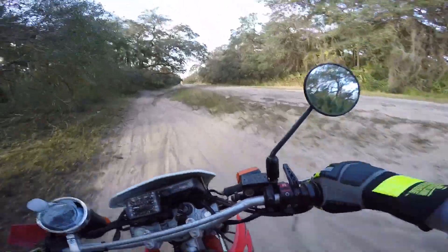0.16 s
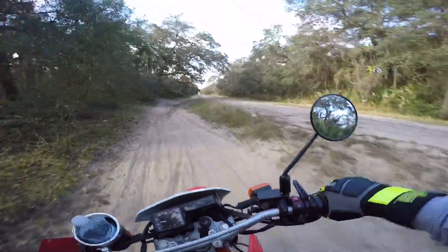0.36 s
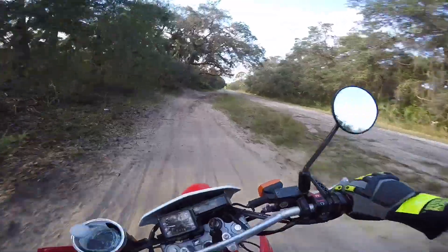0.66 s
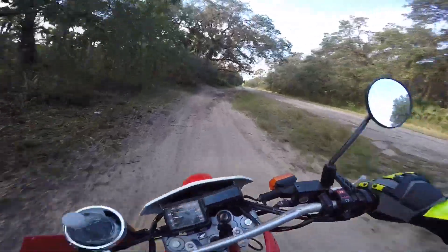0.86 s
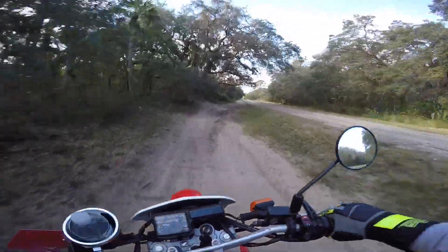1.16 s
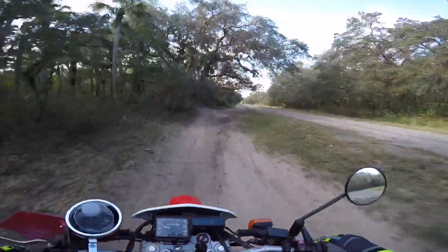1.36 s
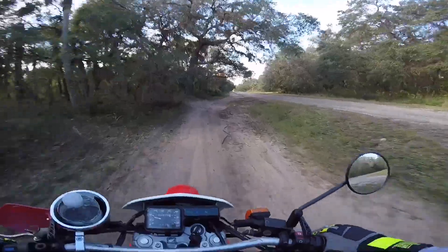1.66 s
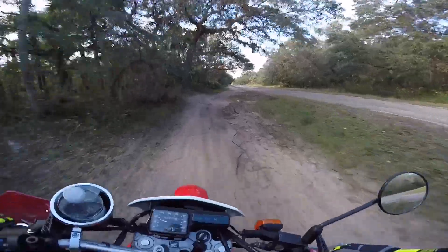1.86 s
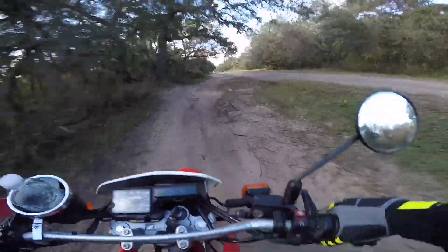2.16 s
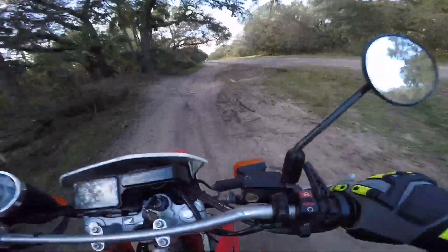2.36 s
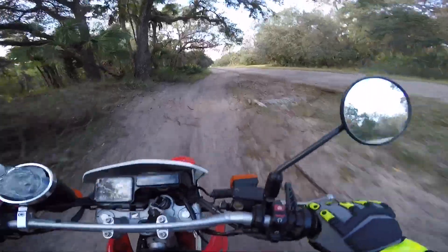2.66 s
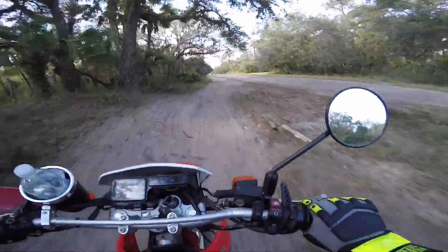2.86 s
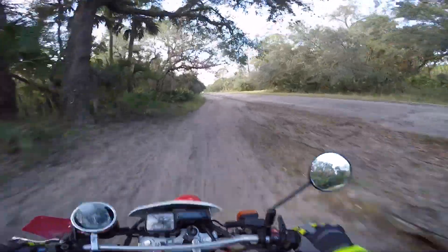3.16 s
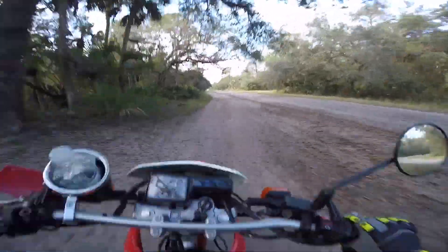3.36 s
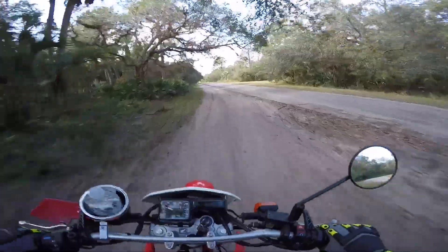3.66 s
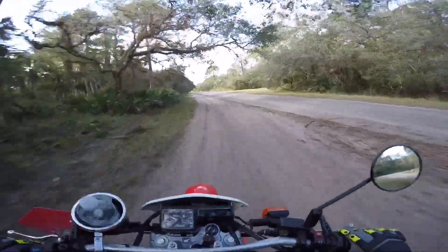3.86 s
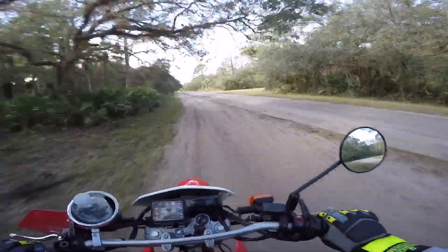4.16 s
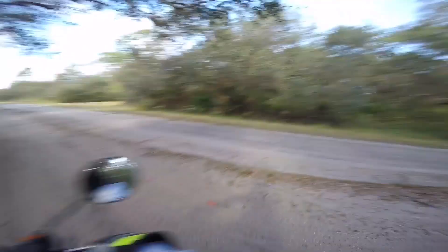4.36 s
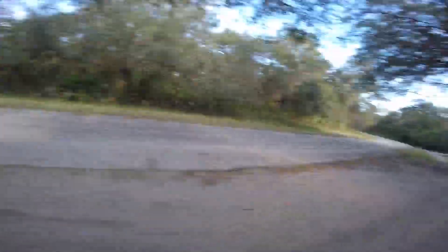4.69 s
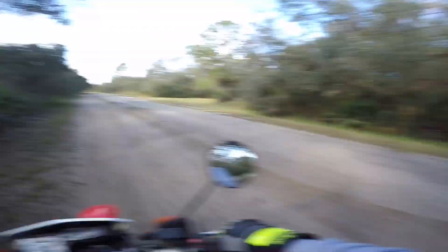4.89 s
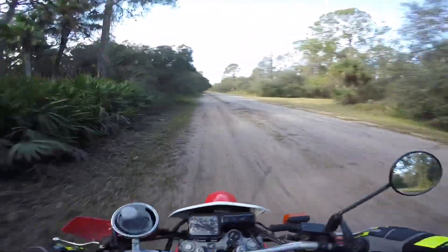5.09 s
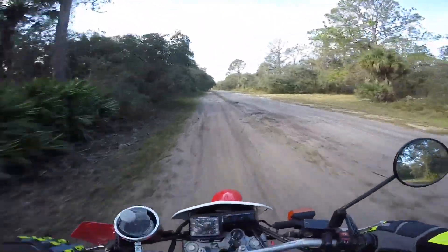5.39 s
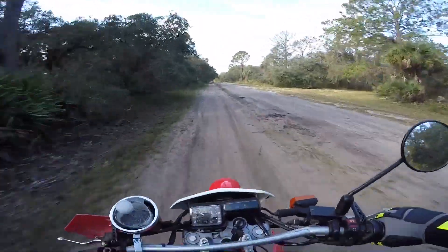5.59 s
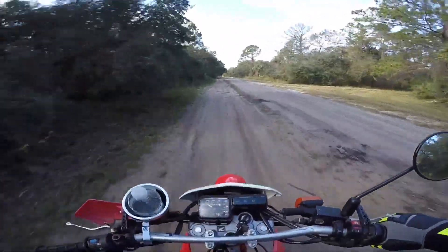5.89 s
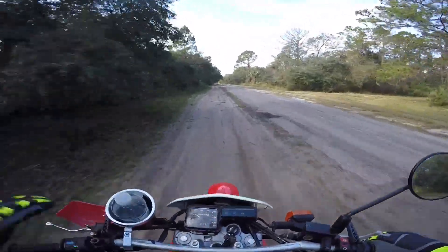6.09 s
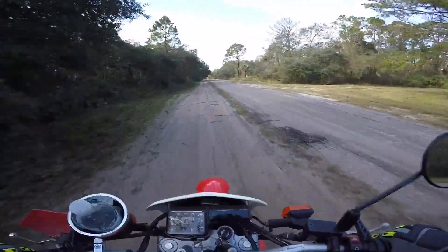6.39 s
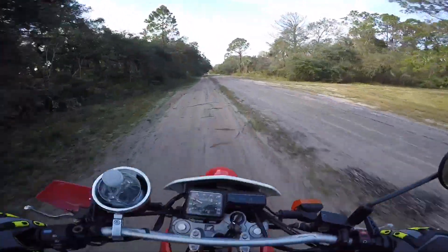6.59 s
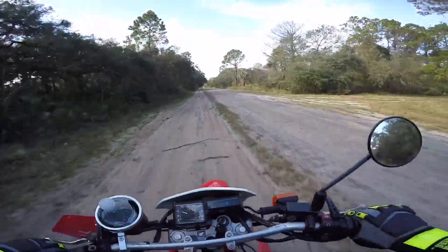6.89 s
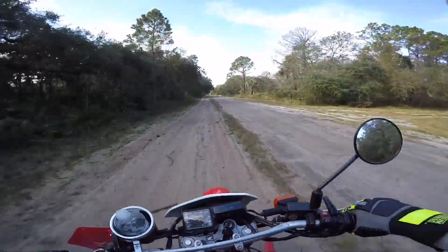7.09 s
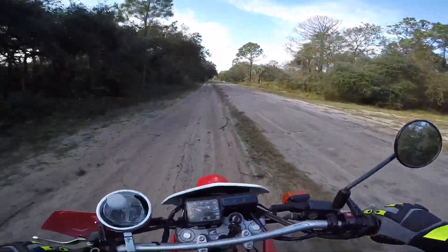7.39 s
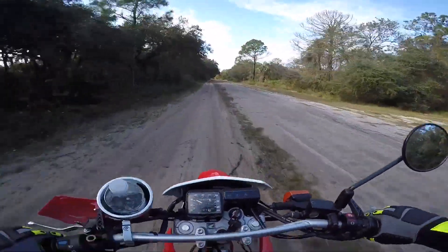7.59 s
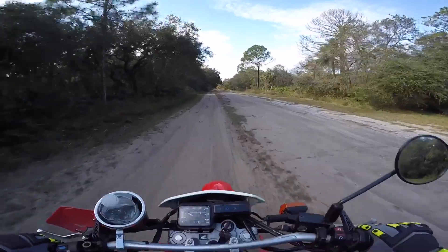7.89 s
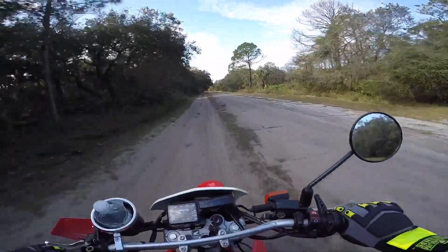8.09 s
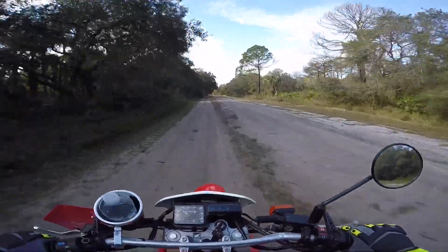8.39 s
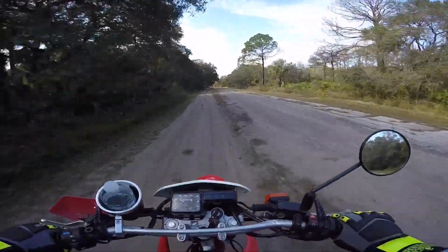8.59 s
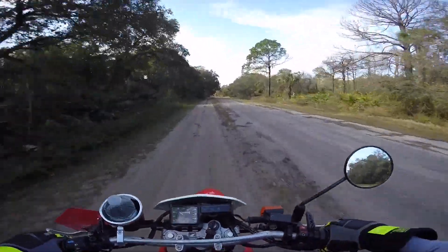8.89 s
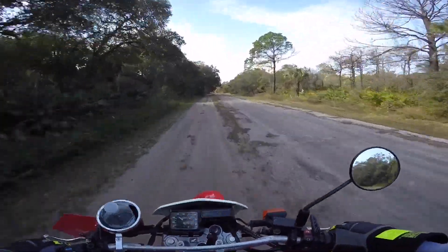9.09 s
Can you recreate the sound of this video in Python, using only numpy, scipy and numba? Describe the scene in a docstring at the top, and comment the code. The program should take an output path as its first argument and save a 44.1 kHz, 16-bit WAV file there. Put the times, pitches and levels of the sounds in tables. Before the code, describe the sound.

A single-cylinder four-stroke trail bike is heard from inside the rider's helmet, almost entirely on the right side. Low wind buffeting and a softer rush run throughout, with faint gear whine, valve chatter and ticking loose parts. For the first 1.3 seconds the throttle is blipped five times, each a deep boom with a raspy bark. The revs sag until 2.3 seconds, then climb in uneven bursts until about 4.2. The bike coasts more quietly. At 5.6 seconds comes a light plastic knock, and at 5.9 the visor shuts with a sharp crack and thud, the loudest moment, slightly overloaded. Everything dips briefly and recovers, a little changed in tone. The engine surges again from 6.3 seconds, makes a longer rising pull from 7.7 to 8.6, then drops back under the wind until the end, just after 9 seconds.

```python
"""On a sandy track, inside the helmet of a rider on a single-cylinder four-stroke trail bike.
The throttle is blipped, held and shut. Periodic gas pulses excite resonances: the airbox booms and the
exhaust barks. Valves chatter, gears whine, loose parts tick, and turbulent air buffets the shell.
Midway the visor is knocked shut with sharp cracks; the microphone overloads, its gain ducks and recovers."""
import sys
import numpy as np
from scipy import signal
from scipy.fft import rfft, irfft
from scipy.io import wavfile
from scipy.ndimage import uniform_filter1d
from numba import njit

SR = 44100
rng = np.random.default_rng(int(sys.argv[2]) if len(sys.argv) > 2 else 0)


def materialize(psi):
    """Save the field psi as 16-bit PCM at rate SR to the path in sys.argv[1].

    A 1-D psi becomes a single channel; in a 2-D psi each row is a channel.
    """
    bounded = np.clip(np.atleast_2d(psi).T, -1, 1)
    quanta = np.round(bounded * 32767).astype(np.int16)
    wavfile.write(sys.argv[1], SR, quanta)


N = 407925
TIME = np.arange(N) / SR


# spectra of the airbox and of the intake valve's thump: f/Hz, level/dB
AIRBOX = [(20, -40), (42, -26), (72, 20.5), (100, 17), (125, 3.5), (160, -10.5), (210, -12.5), (400, -59.5),
          (4000, -110)]
THUMP = [(100, -23.5), (190, -19.5), (280, -7), (360, -7), (600, -2.5), (900, -22), (3000, -56.5),
         (10000, -94.5)]
def intake(cycle, firing_hz, boom_db, note_db):
    """Cavity resonance: a gulp of air per cycle drives the airbox; the valve's thump fades with speed."""
    gulp = strokes(cycle, place=.1, jitter=.002, scatter_db=.7)
    suction = -strokes(cycle, place=-.11, jitter=.004, scatter_db=2.5)
    boom = unit(colour(gulp, AIRBOX, tail=.026)) * undb(boom_db - 2.3)
    thump_db = note_db - 5.5 - 1.24 * (firing_hz - 36)
    return boom + unit(colour(suction, THUMP, tail=.065)) * undb(thump_db)


# pressure pulses within one engine cycle: place/cycles, relative strength
PULSES = [(-.08, -.4), (.135, .68), (.32, 1)]
# spectra of the pipe's note and of the turbulent gas in it: f/Hz, level/dB
PIPE = [(90, -22), (150, -8), (205, -6.5), (250, 4.5), (305, 1), (360, 6.5), (440, -9.5), (700, -49),
        (5000, -110)]
GROWL = [(110, -19.5), (190, -4), (280, 1), (370, 0.5), (460, -13), (900, -39.5), (5000, -92)]
def exhaust_note(cycle, firing_hz, note_db, tuned_hz=47.07, pipe_share=.55):
    """Pipe resonance: a group of pressure pulses sounds the note, and turbulent gas adds a growl."""
    # the pipe's echo time holds the pulses apart, so the strongest partials climb slower than the revs
    stretch = (firing_hz / tuned_hz) ** pipe_share - 1
    group = sum(size * strokes(cycle + (PULSES[-1][0] - place) * stretch, place, .002, scatter_db=.9)
                for place, size in PULSES)
    note = unit(colour(group, PIPE, tail=.088))
    growl = unit(colour(puffs(cycle, place=.1, decay=.3), GROWL))
    return (note + growl * undb(-17.5)) * undb(note_db)


# spectra of each blast's rasp, its higher bite and its hiss: f/Hz, level/dB
RASP = [(250, -14.5), (440, -4.5), (560, 7), (740, 9), (830, -3), (920, -23), (1250, -24.5), (1600, -30),
        (2600, -43), (6000, -77.5), (15000, -100)]
BITE = [(500, -29.5), (950, -5.5), (1100, 1), (1300, 0.5), (1480, -10.5), (1700, -21), (3000, -36),
        (12000, -80)]
SPIT = [(900, -14.5), (2000, 5), (4000, 0.5), (7000, -12.5), (14000, -23.5)]
def exhaust_rasp(cycle, firing_hz, note_db, rasp_db, detune=.045):
    """Source and filter: blasts excite upper resonances that wander with the gas's heat and flow."""
    blasts = unit(sum(size ** 3 * strokes(cycle, place, .0018, scatter_db=1.5) for place, size in PULSES))
    gas = unit(puffs(cycle, place=.25, decay=.16))
    spectra = [[(hz * ratio, db) for hz, db in RASP] for ratio in (1 - detune, 1 + detune)]
    low, high = (unit(colour(blasts + .13 * gas, spectrum, tail=.5)) for spectrum in spectra)
    drift = np.clip(.5 + .4 * walk(7), 0, 1)
    rasp = unit(low * (1 - drift) + high * drift) * undb(rasp_db)
    spit = unit(colour(puffs(cycle, place=.31, decay=.05), SPIT)) * undb(rasp_db - 47)
    # faster gas flow at high revs strengthens the bite
    bite_db = (note_db + rasp_db) / 2 - 18.5 + .31 * (firing_hz - 47.5)
    return rasp + spit + unit(colour(blasts + gas / 10, BITE)) * undb(bite_db)


# throttle twists: t open/s, t released/s, opening (0-1), rise/s, fall/s, extra note/dB, extra rasp/dB
TWISTS = [(0, 0.06, 1, .07, 0.047, -2, -1.5), (0.238, 0.332, 0.87, .07, 0.063, 0.5, 3),
          (0.561, 0.672, 0.98, .08, .08, 1.5, -1), (0.812, 0.992, 0.89, .07, 0.11, 3, 0.5),
          (1.232, 1.315, 0.77, .08, .07, 5.5, 3), (2.322, 2.36, 0.87, .05, .075, 0.5, 3),
          (2.39, 2.503, 0.76, .07, .075, 0.5, -1), (2.526, 2.926, 0.92, .1, 0.18, -1, -2),
          (2.937, 3.13, 0.35, .07, .075, -2.5, 0.5), (3.146, 3.268, 0.97, .07, 0.087, 1, 3.5),
          (3.271, 3.461, 0.81, .07, .075, 3, 2.5), (3.455, 3.849, 0.83, .07, .075, 2, -3.5),
          (3.836, 4.176, 0.81, .07, .075, 1, 2), (6.301, 6.565, 0.47, .07, .075, -2, 1),
          (6.587, 6.984, 0.96, .09, 0.18, 1, -1), (7.023, 7.364, 0.45, .07, .075, 6, -7.5),
          (7.405, 7.485, 0.94, .09, .075, 1.5, -1), (7.7, 8.638, 0.93, .11, 0.11, .5, -2.5)]
def throttle(slowness=1):
    """Trapezoidal envelopes: each twist opens, holds and closes; slowness stretches the rise."""
    twists = [np.interp(TIME, [on - slowness * rise, on, off, off + fall], [0, opening, opening, 0])
              for on, off, opening, rise, fall, *_ in TWISTS]
    return np.clip(np.max(twists, axis=0), 0, 1)


# response to the throttle: opening (0-1), boom level/dB, note level/dB, rasp level/dB
RESPONSE = [(0, -38.5, -38.5, -50.5), (0.5, -21, -30, -35), (0.999, -17.5, -19.5, -25.5)]
def engine(cycle, firing_hz, load, bark_s=.18):
    """Amplitude modulation by the throttle: boom and note swell first, then a fresh twist barks."""
    openings, booms, notes, rasps = np.transpose(RESPONSE)
    uneven_burn_db = walk(18)
    swell = throttle(slowness=1.5)
    extras = curves(sorted((s, *twist[-2:]) for twist in TWISTS for s in twist[:2]))
    extra_note_db, extra_rasp_db = (lag(db * load, .01) for db in extras)
    bark_db = 4 * np.maximum(load - lag(load, bark_s), 0)
    boom_db = np.interp(swell, openings, booms) + uneven_burn_db
    note_db = np.interp(swell, openings, notes) + uneven_burn_db + extra_note_db
    rasp_db = np.interp(load, openings, rasps) + uneven_burn_db + extra_rasp_db + bark_db
    exhaust = exhaust_note(cycle, firing_hz, note_db) + exhaust_rasp(cycle, firing_hz, note_db, rasp_db)
    return exhaust + intake(cycle, firing_hz, boom_db, note_db)


# gear tones: multiple of the firing rate, level/dB
GEAR_ORDERS = [(6, -5), (10, -7), (12, -4), (13, -12), (14, 1), (15, -8), (16, -2), (17, -7), (18, -7),
               (20, -13)]
# their radiation by the engine case: f/Hz, gain/dB
CASE_RADIATION = [(230, -2.5), (420, -3.5), (560, 2), (660, 4), (800, -3.5), (1000, -7)]
# strength of the whine: t/s, level/dB
WHINE = [(0, -29), (1.3, -34), (1.65, -28), (2.1, -33), (2.8, -32), (3.7, -27), (4.4, -36), (4.75, -30),
         (5.3, -25.5), (5.7, -26), (6.4, -40.5), (6.8, -27), (7.2, -33.5), (8.3, -26), (8.8, -31.5),
         (9.25, -33.5)]
def gears(cycle):
    """Gear meshing: fluttering harmonics of the firing rate radiate through the case."""
    mesh = harmonics(cycle, GEAR_ORDERS) * (1 + .23 * walk(90))
    return unit(colour(mesh, CASE_RADIATION)) * undb(curves(WHINE)[0])


# machinery: t/s, then relative level/dB of frame hum, case chatter and chain ring
MACHINERY = [(0, -24, -26, -53.5), (1.2, -34, -29, -49.5), (1.5, -50.5, -32, -51), (1.7, -39.5, -26.5, -50),
             (2.05, -24, -24, -52.5), (2.8, -51.5, -26.5, -64.5), (3.7, -28, -33.5, -53.5),
             (4.4, -38.5, -37, -54), (4.7, -34, -26.5, -50), (5.1, -27, -29.5, -46.5),
             (5.6, -27, -24.5, -44.5), (6.4, -26.5, -41, -61), (6.8, -34.5, -30.5, -50),
             (7.2, -26.5, -37.5, -49.5), (8.3, -44, -33, -48), (8.75, -30.5, -37, -52),
             (9.25, -34.5, -33, -44.5)]
# spectra of the case, the tapped drive and the drive's narrow resonances: f/Hz, level/dB
CASE = [(200, -32.5), (450, -12.5), (560, 9.5), (720, 0.5), (930, -25), (1300, -30.5), (1700, -23),
        (2500, -50.5), (12000, -92)]
DRIVE_RING = [(1400, -33), (1850, 0.5), (2020, -2), (2150, -18), (2400, -32), (3200, -25.5), (3480, -15),
              (3750, -34), (7000, -56)]
DRIVE_TONES = [(1200, -39), (1750, -13.5), (1900, -10), (2000, 1.5), (2090, -7.5), (2200, -24), (3250, -34),
               (3450, -15), (3620, -32), (4600, -41), (5000, -30.5), (5400, -45.5), (7000, -70.5)]
# low tones of the frame: multiple of the firing rate, level/dB
FRAME_ORDERS = [(1, -17), (2, 4), (3, -2), (4, 0)]
def machinery(cycle, load):
    """Forced vibration: valve taps ring the case and the chain drive, and the frame hums."""
    hum_db, case_db, chain_db = curves(MACHINERY)
    taps = sum(strokes(cycle, place, jitter=.002, scatter_db=2.5) for place in (.06, .37, .55, .83))
    chatter = unit(colour(unit(taps) + .6 * noise(), CASE)) * undb(case_db - 4.5 - 3 * load)
    whirr = unit(colour(taps, DRIVE_RING)) * undb(chain_db - 5.5)
    # the frame stands out most when the wheel drives the engine
    hum = harmonics(cycle, FRAME_ORDERS) * undb(hum_db - 2 * load)
    # the crank turns twice a firing; its partials slide through the narrow resonances
    crank = unit(strokes(2 * cycle, place=.78, jitter=.0025, scatter_db=3))
    ring = unit(colour(crank + .8 * noise(), DRIVE_TONES)) * undb(chain_db - 2)
    return chatter + whirr + hum + ring


# knocks on helmet and visor: t/s, thud level/dB, clack level/dB
KNOCKS = [(5.63, -18, -9.5), (5.640, -19.5, -11), (5.846, -16, -12.5), (5.855, -10, -9.5),
          (5.861, -5, -0.5), (5.867, 7, 5.5)]
# modes of the helmet: f/Hz, T60/s, level/dB
HELMET_MODES = [(59.4, 0.083, 1.5), (224, 0.037, 9.5), (330, 0.037, -10.5), (556, 0.027, -2),
                (820, 0.011, 0.5), (1083, 0.032, -18.5), (1940, 0.0028, -32)]
# spectrum of scraping plastic: f/Hz, level/dB
CLACK = [(300, 10), (900, 13.5), (2000, -6.5), (5000, -27), (14000, -59)]
def visor_knocks(clack_s=.0029):
    """Damped modes: gloved knocks ring the shell and its trapped air, each with a plastic clack."""
    times, thud_db, clack_db = np.transpose(KNOCKS)
    t = TIME[:SR // 4]
    ring = sum(undb(db - 60 * t / t60) * np.sin(2 * np.pi * hz * t) for hz, t60, db in HELMET_MODES)
    contact = signal.windows.hann(SR // 1500)
    thud = np.convolve(ring, contact / contact.sum())
    thuds = signal.fftconvolve(impulses(times, undb(thud_db)), thud)[:N]
    scrape = signal.fftconvolve(impulses(times, undb(clack_db)), np.exp(-t / clack_s))[:N]
    return thuds + colour(scrape * noise(), CLACK)


# change made by the shut visor: f/Hz, gain/dB
VISOR = [(40, 0.5), (90, 0), (140, 3.5), (200, 3.5), (280, 0.5), (340, 0), (440, -5), (780, -2), (1100, 1),
         (1450, 1), (3000, 0.5), (5000, -2.5), (10000, 0)]
def through_visor(outside, shut_s=5.87):
    """Transmission through a panel: sound enters freely at first, then through the shut visor."""
    shut = lag(1. * (TIME > shut_s), .01)
    return outside * (1 - shut) + colour(outside, VISOR, tail=0) * shut


# air over the helmet: t/s, then relative level/dB of buffeting and rush
AIRFLOW = [(0, -24.5, -53.5), (1.05, -26.5, -56), (1.45, -28, -56.5), (1.8, -23, -54), (2.25, -24, -54.5),
           (2.35, -20.5, -52), (2.47, -20.5, -57.5), (2.85, -31, -56.5), (3.25, -21.5, -57),
           (3.65, -24.5, -55.5), (4.4, -30.5, -59), (4.68, -27.5, -59), (5, -22, -52.5),
           (5.6, -20.5, -51.5), (6.45, -26, -58), (6.8, -28, -56.5), (7.4, -24.5, -55.5), (8.2, -26, -55.5),
           (8.8, -25, -58), (9.25, -23, -57)]
# spectra of the buffeting and the rush: f/Hz, level/dB
BUFFET = [(12, -16), (36, 4.5), (60, -5.5), (110, -7.5), (180, -14), (300, -12), (450, -17.5), (800, -22.5),
          (2000, -82), (10000, -115)]
RUSH = [(400, -9.5), (700, 17.5), (1100, 7.5), (1600, -0.5), (2050, -4), (2250, -7.5), (2800, -15.5),
        (3400, -13.5), (3900, -16.5), (4550, -20.5), (5050, -21.5), (5600, -29.5), (6500, -35.5),
        (14000, -61)]
def wind(load, treble_hz=2900):
    """Turbulence: eddies thump the helmet; air and tyres rush through its shell, brighter when louder."""
    buffet_db, rush_db = curves(AIRFLOW)
    rush_db += 2.5 * load  # the driven tyre adds to the rush
    buffet = unit(colour(noise(), BUFFET)) * undb(buffet_db + 1.5 - 3.2 * load + 1.4 * walk(16))
    air = noise()
    treble = signal.sosfiltfilt(signal.butter(4, treble_hz, "high", fs=SR, output="sos"), air)
    air += treble * (undb(.22 * (rush_db + 57.5)) - 1)
    return buffet + unit(colour(air, RUSH)) * undb(rush_db + 18 + walk(45))


# ticks of loose parts, and sharp cracks of the knocks on the visor (5.6-5.9 s): t/s, relative level/dB
TICKS_AND_CRACKS = [(0.283, -55), (.6251, -52), (.918, -50), (.959, -55), (1.253, -49), (1.2779, -48),
                    (2.58, -48.5), (2.666, -49), (2.7229, -51), (3.144, -57), (3.2, -55), (3.652, -53),
                    (3.788, -50.5), (3.848, -54), (3.906, -52), (4.0623, -51), (4.0827, -51), (4.125, -46),
                    (4.307, -56), (4.351, -61), (5.6283, -59), (5.639, -58), (5.8466, -38), (5.863, -27),
                    (5.866, -31), (6.704, -55), (6.765, -52), (6.94, -50), (6.955, -51), (7.389, -48),
                    (7.458, -48), (7.485, -52), (7.771, -54), (7.791, -50), (8.0037, -52), (8.0311, -45.5),
                    (8.093, -54), (8.108, -52), (8.169, -53), (8.235, -53), (8.3285, -55), (8.3916, -56),
                    (8.464, -49.5), (8.5031, -50), (8.537, -55), (8.5561, -51), (8.688, -52.5)]
# spectrum of a tick or crack: f/Hz, level/dB
IMPACT_SPECTRUM = [(800, -5.5), (2000, -1.5), (3500, -4), (6000, -10), (8000, -17.5), (14000, -24)]
def ticks_and_cracks(buzz_s=.0014):
    """Hard impacts are broadband: loose parts tick and the knocked visor cracks, each with a short buzz."""
    times, db = np.transpose(TICKS_AND_CRACKS)
    hits = impulses(times, undb(db + 27.5))
    buzz = signal.fftconvolve(hits, np.exp(-TIME[:SR // 20] / buzz_s))[:N] * noise()
    return colour(hits + undb(-12) * buzz, IMPACT_SPECTRUM)


# how hard the ground shakes the loose parts: t/s, relative level/dB
SHAKE = [(0, -71), (.92, -60), (1.3, -63), (2.25, -65), (2.34, -58), (2.45, -63), (2.65, -64.5), (3.1, -63),
         (3.65, -59), (4.1, -56), (4.3, -63), (6.55, -67), (6.75, -59.5), (7.1, -67), (7.45, -58),
         (7.7, -64), (8.05, -57), (8.25, -58), (8.5, -57.5), (8.7, -51)]
# spectrum of their rattle: f/Hz, level/dB
RATTLE = [(1500, -9.5), (4000, 27.5), (7000, 13.5), (12000, 5.5), (16000, -16)]
def rattle(cycle, load, chances_per_s=260, rub_s=.002):
    """Intermittent contact: loose parts scratch faintly, in spurts, when the engine pulls hard."""
    when, chance, size, place = rng.random((int(chances_per_s * N / SR), 4)).T
    i = (when * N).astype(int)
    heard = chance < .35 * load[i] ** 4 * undb(5 * walk(5)[i])
    level_db = curves(SHAKE)[0][i] - 4 * np.log(.06 + size)
    shaken_at = np.floor(cycle[i]) + .3 + .45 * (place - .5)  # bunched in one part of the cycle
    times = np.interp(shaken_at, cycle, TIME, left=N / SR)
    fade = np.exp(-TIME[:SR // 20] / rub_s)
    rubs = signal.fftconvolve(impulses(times, heard * undb(level_db)), fade / np.linalg.norm(fade))[:N]
    return colour(rubs * noise(), RATTLE)


def strokes(cycle, place, jitter, scatter_db):
    """Quasi-periodic pulse train: one uneven pulse per cycle; place and jitter are in cycles."""
    count = int(cycle[-1]) + 1
    timing, strength = rng.standard_normal((count, 2)).T
    times = np.interp(np.arange(count) + place + jitter * timing, cycle, TIME, left=N / SR, right=N / SR)
    return impulses(times, undb(scatter_db * strength))


def puffs(cycle, place, decay):
    """Modulated noise: one exponentially fading burst per cycle; place and decay are in cycles."""
    return noise() * np.exp(-((cycle - place) % 1) / decay)


def harmonics(cycle, orders):
    """Harmonic series on the firing rate, each partial wavering in level and phase."""
    return sum(undb(db + 1.8 * walk(8)) * np.sin(2 * np.pi * (k * cycle + rng.random()) + .25 * walk(14))
               for k, db in orders)


def impulses(times, sizes):
    """Impulses at the given times, each shared between two samples."""
    at = np.clip(np.asarray(times) * SR, 0, N)
    i = at.astype(int)
    return (np.bincount(i, sizes * (1 - at + i), N + 2) + np.bincount(i + 1, sizes * (at - i), N + 2))[:N]


def colour(x, points, tail=.98, size=8192):
    """Filter by (f/Hz, gain/dB) points: tail 1 is minimum phase and rings on, 0 is zero phase."""
    hz, db = np.transpose(points)
    bins = np.maximum(np.arange(size // 2 + 1) * SR / size, 1)
    cepstrum = irfft(np.log(undb(np.interp(np.log(bins), np.log(hz), db))))
    cepstrum[1:size // 2] *= 2
    cepstrum[size // 2 + 1:] = 0
    log_gain = rfft(cepstrum)
    response = np.roll(irfft(np.exp(log_gain.real + 1j * tail * log_gain.imag)), size // 2)
    return signal.fftconvolve(x, response)[size // 2:size // 2 + N]


def noise():
    """White noise."""
    return rng.standard_normal(N)


def walk(rate_hz):
    """Slow fluctuation of rms 1: random levels, each held for one period and smoothed twice."""
    hold = int(SR / rate_hz)
    held = rng.standard_normal(4096)[np.arange(N) // hold]
    return unit(uniform_filter1d(uniform_filter1d(held, hold), hold))


def lag(x, lag_s):
    """First-order relaxation towards x."""
    keep = np.exp(-1 / (lag_s * SR))
    return signal.lfilter([1 - keep], [1, -keep], x)


def curves(table):
    """Linear interpolation of each column in time."""
    times, *columns = np.transpose(table)
    return [np.interp(TIME, times, column) for column in columns]


def undb(db):
    """Decibels to amplitude ratio."""
    return 10 ** (np.asarray(db) / 20)


def unit(x):
    """Normalisation to rms 1."""
    return x / np.sqrt(np.mean(x ** 2))


# engine speed: t/s, firing rate/Hz
FIRING_RATE = [(0.0, 38.77), (0.21, 37.11), (0.33, 41.11), (0.53, 39.03), (0.71, 47.32), (0.8, 43.32),
               (1.03, 50.07), (1.2, 44.02), (1.33, 48.47), (1.61, 44.19), (1.81, 43.9), (2.18, 36.08),
               (2.3, 35.5), (2.49, 31.48), (2.64, 35.19), (2.77, 34.84), (2.94, 37.1), (3.07, 35.14),
               (3.23, 42.03), (3.4, 38.87), (3.69, 49.98), (3.76, 51.35), (3.98, 45.71), (4.21, 49.03),
               (4.4, 41.95), (4.67, 43.04), (5.53, 39.12), (6.21, 35.49), (6.38, 39.97), (6.49, 36.91),
               (6.61, 39.91), (6.89, 43.35), (7.27, 40.15), (7.51, 44.04), (7.63, 41.02), (7.78, 45.19),
               (8.37, 51.44), (8.68, 52.72), (8.85, 45.5), (9.25, 45.39)]
# transfer to the left channel: f/Hz, gain/dB
LEFT_CHANNEL = [(30, -22.5), (110, -17), (280, -24), (500, -29), (750, -31.5), (1200, -34.5), (2500, -41.5),
                (12000, -58)]
def scene():
    """Superposition at one microphone on the right; the left carries a faint dull copy and the knocks."""
    load = throttle()  # 0 = shut, 1 = pulling
    firing_hz = curves(FIRING_RATE)[0]
    cycle = np.cumsum(firing_hz) / SR + .45
    bike = engine(cycle, firing_hz, load) + gears(cycle) + machinery(cycle, load) + rattle(cycle, load)
    knocks = visor_knocks()
    mic = undb(5.5) * (through_visor(bike + wind(load)) + knocks + ticks_and_cracks())
    dull_knocks = colour(knocks, [(200, -12), (400, -17), (1500, -47)])
    return np.array([colour(mic, LEFT_CHANNEL) + dull_knocks, mic])


@njit
def duck(over_db, attack_s, release_db_per_s):
    """Automatic gain control: the cut in dB lags behind the peak excess and releases at a steady rate."""
    cut_db, held, cut = np.empty(len(over_db)), 0., 0.
    for i in range(len(over_db)):
        held = max(held - release_db_per_s / SR, over_db[i], 0.)
        cut += (held - cut) / (attack_s * SR)
        cut_db[i] = cut
    return cut_db


# preamplifier hiss: f/Hz, level/dB
HISS = [(1000, 2.5), (11500, 0.5), (15000, -19)]
def record(dry, ceiling=.96, top_hz=15600):
    """Saturation: a sudden knock outruns the gain control and clips softly; hiss and a low-pass follow."""
    over_db = 20 * np.log10(np.abs(dry).max(axis=0) + 1e-9) - 1.5
    ducked = dry * undb(-duck(over_db, attack_s=.011, release_db_per_s=44.5))
    clipped = ceiling * ducked / (1 + (ducked / ceiling) ** 6) ** (1 / 6)
    hiss = np.array([undb(db) * colour(noise(), HISS) for db in (-72, -84)])
    return signal.sosfilt(signal.ellip(8, .2, 70, top_hz, fs=SR, output="sos"), clipped + hiss)


dry = scene()
out = record(dry)
materialize(out)
```